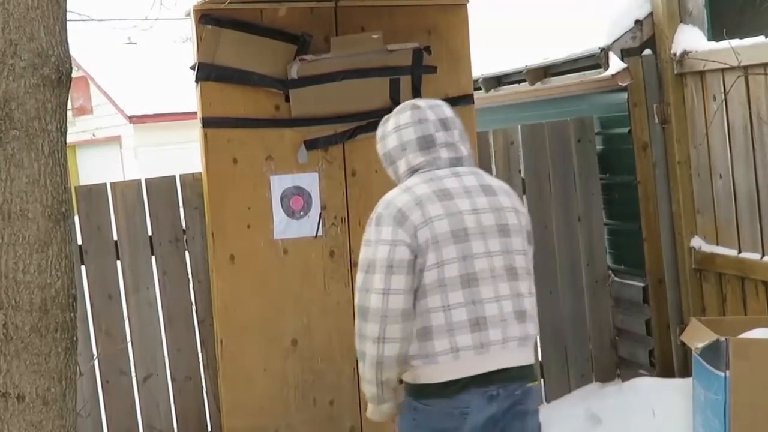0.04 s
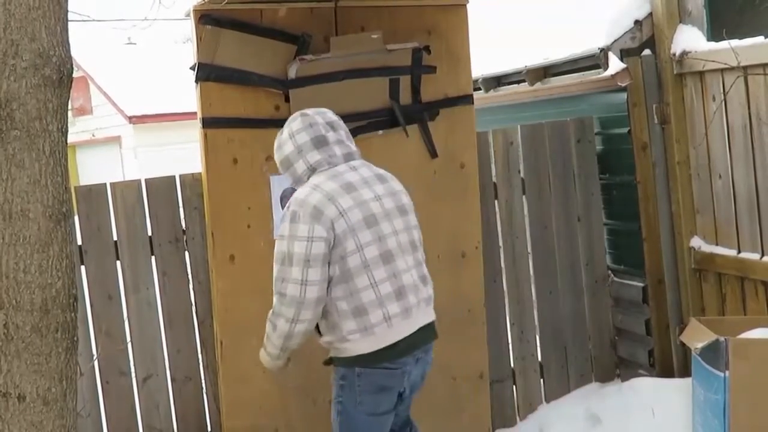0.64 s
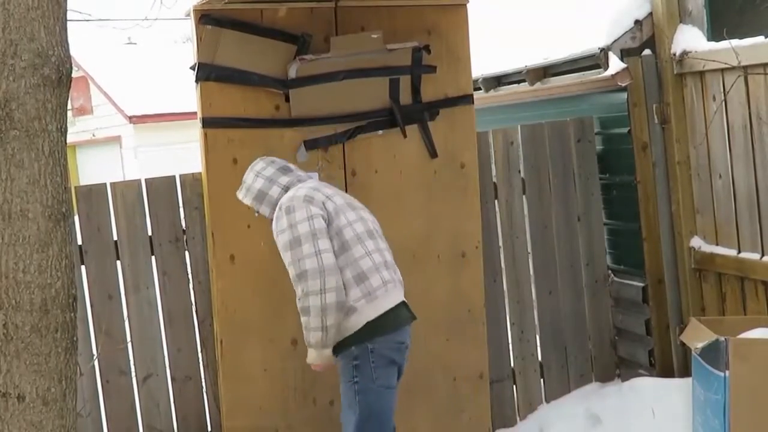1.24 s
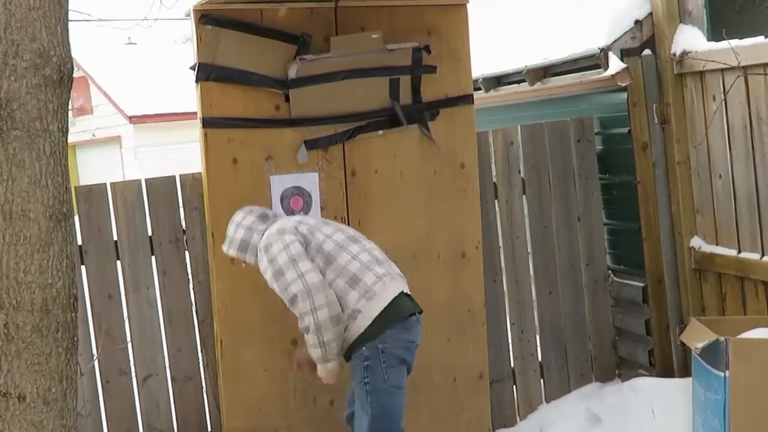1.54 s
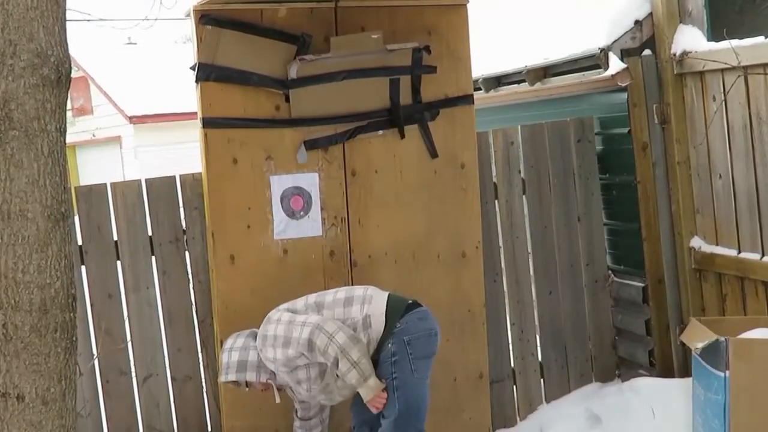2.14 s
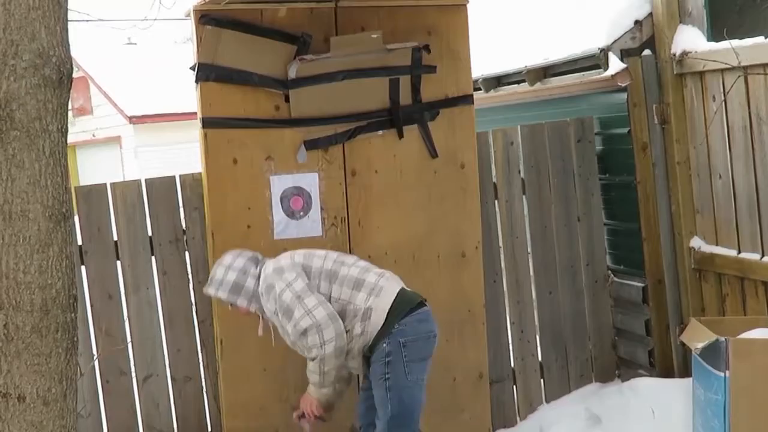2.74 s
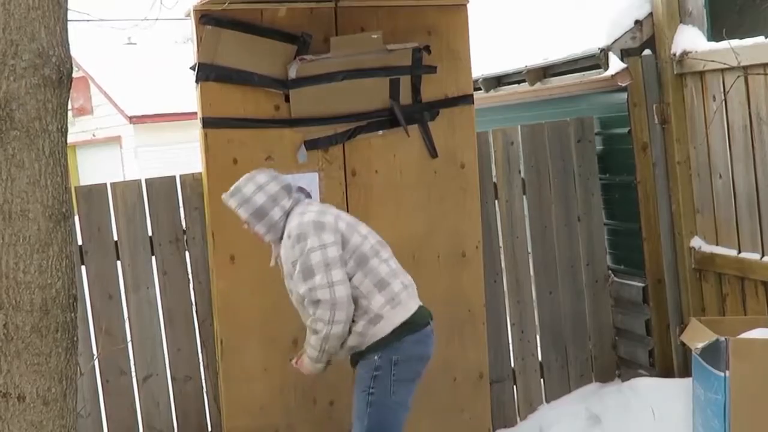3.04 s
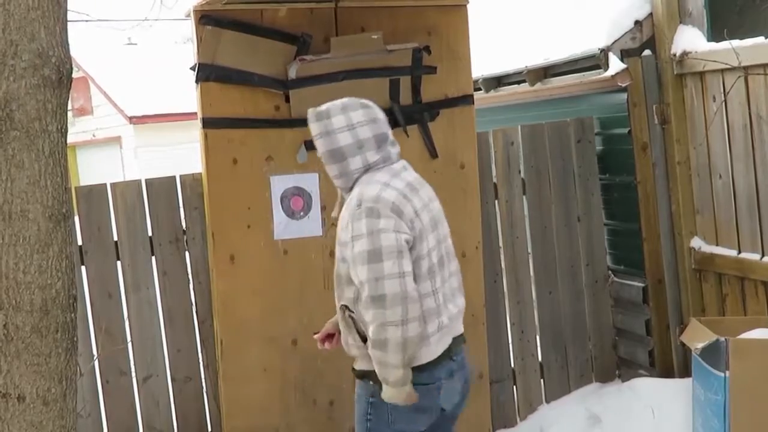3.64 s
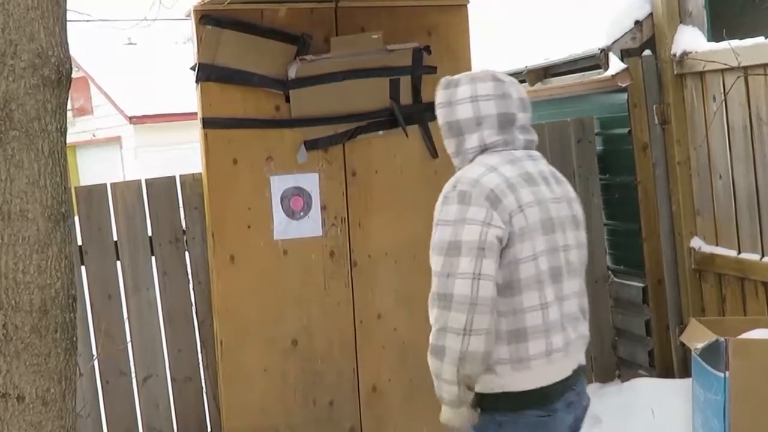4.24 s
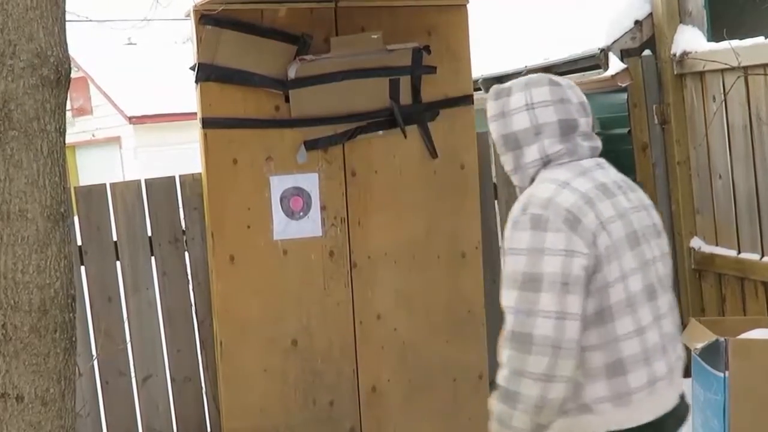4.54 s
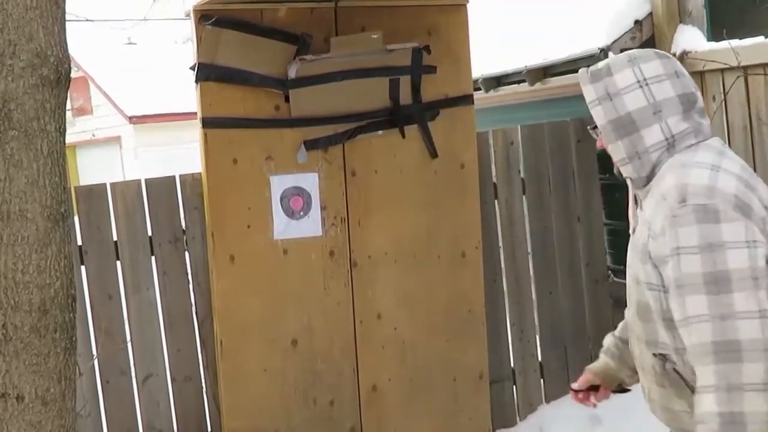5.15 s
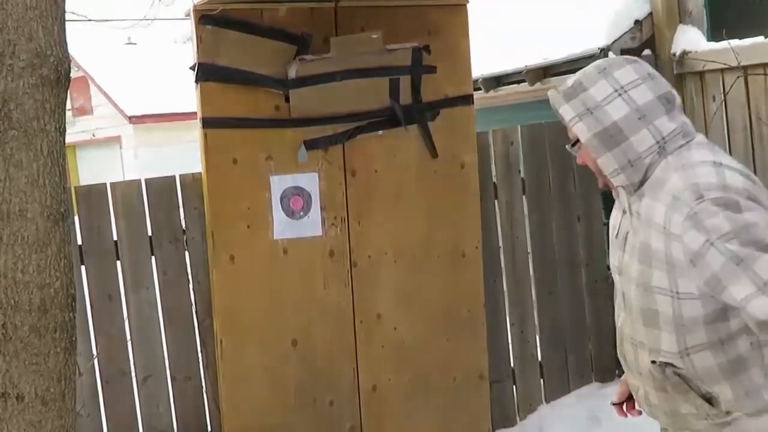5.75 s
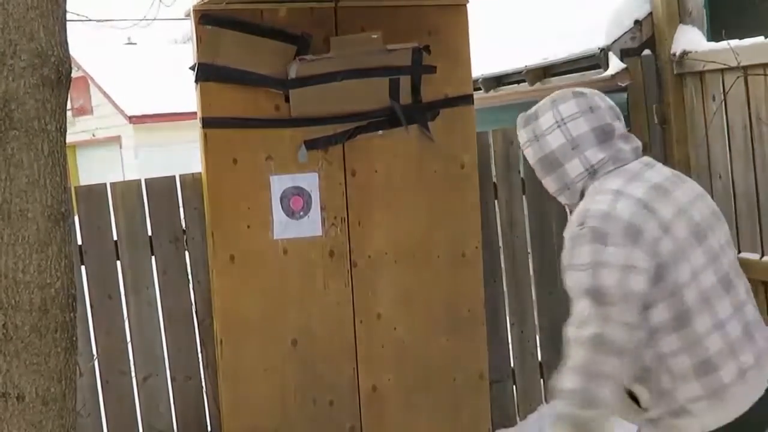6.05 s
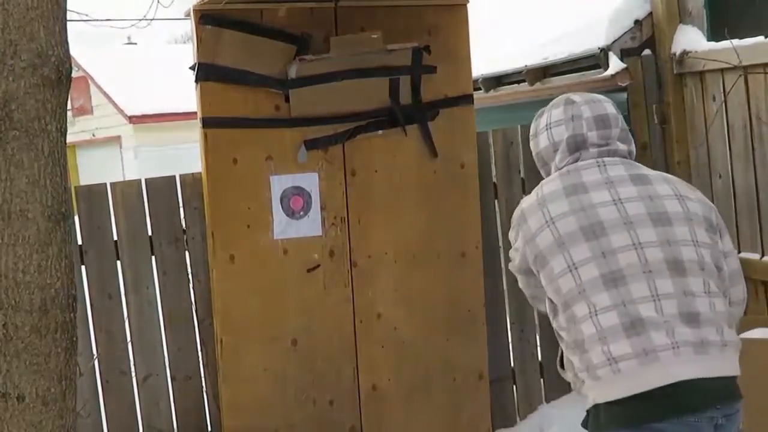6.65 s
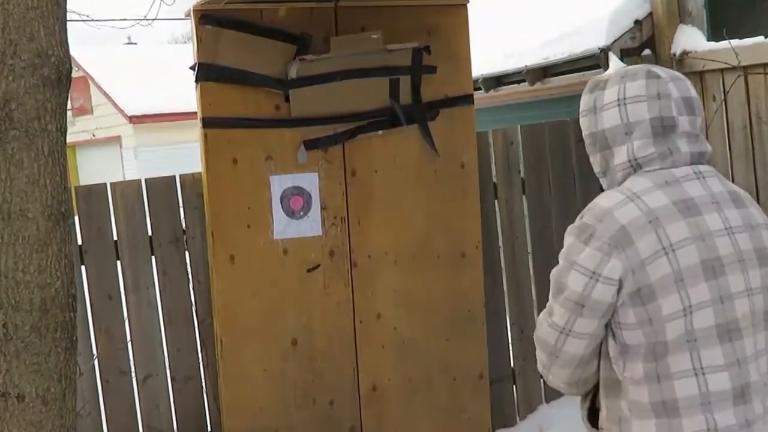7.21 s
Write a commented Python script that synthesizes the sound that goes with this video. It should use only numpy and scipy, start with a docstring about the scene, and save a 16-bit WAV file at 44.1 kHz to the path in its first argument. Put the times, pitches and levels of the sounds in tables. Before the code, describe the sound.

Low gusts of wind rumble and thump on the microphone outdoors, light at first and heavy through the middle. Underneath are soft boot steps in snow, small snaps of crust, a few early clicks of steel blades and a faint wash of far traffic. Once the wind eases, a single knife strikes a wooden board with a sharp, loud thwack that dies quickly in the fenced yard.

```python
"""Gusts buffet the microphone over the hum of a distant town, in a snowy, fenced yard.
Someone gathers throwing knives, steel ticking on steel, and walks back as the snow crunches and snaps.
Then one knife slams into a plywood board: fibres crack, the board rings and rattles, the yard echoes.
The blow overloads the recorder, whose gain control ducks and slowly recovers."""
import sys
import numpy as np
from scipy import signal
from scipy.fft import rfft, irfft, next_fast_len
from scipy.io import wavfile
from scipy.ndimage import uniform_filter1d, map_coordinates

SR = 44100
rng = np.random.default_rng(int(sys.argv[2]) if len(sys.argv) > 2 else 0)


def put_to_file(sound):
    """Save the sound as 16-bit audio at rate SR, in the file named by the first command-line argument."""
    columns = np.atleast_2d(sound).T  # one column per channel
    safe = np.clip(columns, -1, 1)
    whole_steps = np.round(safe * 32767)
    wavfile.write(sys.argv[1], SR, whole_steps.astype(np.int16))


N = 325458

# Level of the distant town's hum, with the recorder's ducking during the strong gusts drawn in.
# Each row: time in seconds, level in dB.
TOWN_LEVEL = [(0, -47), (2.0, -46), (2.7, -46.5), (3.1, -50.5), (4.0, -53.5), (5.3, -53), (5.9, -47),
              (6.6, -46), (7.38, -49)]
# The breeze between gusts. Each row: time in seconds, buffet in dB, flutter in dB relative to it.
BREEZE_LEVEL = [(0, -42.5, -22), (0.4, -54.5, -24), (0.85, -59, -18), (1.3, -67, -6), (1.95, -42, -17),
                (2.08, -33.5, -27), (2.36, -40, -21), (2.48, -28, -22), (2.6, -25.5, -32),
                (3.15, -29.5, -28), (3.44, -42, -22), (3.7, -27.5, -18), (4.1, -28.5, -18.5),
                (4.7, -25, -10.5), (5.02, -32.5, -8), (5.1, -30, -12), (5.3, -35, -9), (5.56, -45.5, -15),
                (5.74, -35.5, -31), (5.9, -34, -25), (5.96, -53, -22), (6.2, -55, -28), (6.6, -50.5, -23),
                (6.85, -77, -22), (7.2, -85, -26), (7.38, -42, -25)]
# Gusts. Each row: start, rise and length in seconds, buffet in dB, flutter in dB relative to it.
GUSTS = [(0.096, 0.013, 0.078, -33, -32), (0.815, 0.013, 0.028, -43, -35), (0.917, 0.0033, 0.027, -33, -39),
         (1.03, 0.008, 0.015, -45.5, -35), (1.545, 0.0071, 0.044, -36, -34),
         (1.688, 0.008, 0.015, -47, -37), (2.003, 0.0069, 0.022, -27.5, -6),
         (2.098, 0.015, 0.16, -18, -20.5), (2.285, 0.01, 0.018, -31, -31),
         (2.385, 0.037, 0.051, -19.5, -28), (2.445, 0.028, 0.063, -17, -11.5),
         (2.589, 0.02, 0.13, -18, -17), (2.733, 0.002, 0.01, -21, -5.5), (2.755, 0.014, 0.12, -18, -20.5),
         (2.85, 0.017, 0.096, -23, -11.5), (2.946, 0.047, 0.071, -14, -14),
         (3.053, 0.0074, 0.064, -25.5, -43), (3.245, 0.022, 0.096, -18, -21),
         (3.41, 0.0085, 0.0083, -23.5, -20), (3.462, 0.013, 0.028, -32, -14),
         (3.492, 0.026, 0.096, -17, -17), (3.571, 0.003, 0.022, -21.5, -8.5),
         (3.605, 0.016, 0.047, -21, -16.5), (3.717, 0.0078, 0.077, -17.5, -12),
         (3.835, 0.012, 0.032, -17, -13.5), (3.868, 0.009, 0.09, -21, -9), (3.985, 0.01, 0.013, -33, -26),
         (4.044, 0.0066, 0.03, -25, -8.5), (4.114, 0.002, 0.011, -20.5, -11),
         (4.175, 0.0016, 0.013, -20.5, -8.5), (4.211, 0.0064, 0.037, -24.5, -6.5),
         (4.265, 0.004, 0.028, -28, -14), (4.306, 0.003, 0.021, -18.5, -2),
         (4.36, 0.0092, 0.095, -25.5, -7.5), (4.499, 0.016, 0.074, -18, -7.5),
         (4.605, 0.012, 0.04, -23.5, -7), (4.699, 0.013, 0.024, -25.5, -9.5),
         (4.765, 0.058, 0.15, -17.5, -5), (4.908, 0.014, 0.043, -19, -3.5),
         (4.962, 0.017, 0.094, -21.5, -7.5), (5.025, 0.006, 0.035, -26, -9),
         (5.118, 0.02, 0.052, -18.5, -8.5), (5.205, 0.0013, 0.038, -20.5, -5),
         (5.235, 0.0079, 0.017, -20, -9.5), (5.317, 0.021, 0.15, -28.5, -28),
         (5.488, 0.0013, 0.025, -28.5, -12), (5.608, 0.024, 0.068, -26, -18.5),
         (5.84, 0.011, 0.014, -35.5, -17), (6.0, 0.0079, 0.025, -36.5, -25),
         (6.036, 0.0027, 0.012, -27.5, -21), (6.097, 0.0068, 0.24, -33.5, -15.5)]
# The buffet's pitch, low in the first light puffs. Each row: time in seconds, frequency ratio.
BUFFET_PITCH = [(0, 0.63), (1.6, 0.68), (2.1, 0.91), (3.2, 0.93), (4.2, 1.0), (5.4, 1.014), (6.3, 0.83)]
# The flutter's brightness. Each row: time in seconds, treble gain in dB.
FLUTTER_TREBLE = [(2.8, -16), (3.7, -4), (4.3, -4.5), (5.2, -7), (5.8, 2.5)]
# Eddies slapping the microphone. Each row: time in seconds, level in dB, pitch in Hz, width in seconds.
THUMPS = [(1.563, -23.5, 172, 0.0043), (2.0225, -6.5, 324, 0.002), (2.497, -13, 322, 0.0041),
          (2.511, -24, 600, 0.0012), (2.65, -13.5, 596, 0.00098), (2.7448, -4.5, 537, 0.0011),
          (2.969, -18, 587, 0.004), (3.295, -13, 288, 0.0041), (3.433, -10, 270, 0.0025),
          (3.5195, -14, 395, 0.0012), (3.5805, -15.5, 666, 0.0035), (3.748, -16, 800, 0.0029),
          (3.842, -4, 274, 0.0016), (3.8526, -11, 290, 0.002), (3.95, -10, 309, 0.0025),
          (4.13, -12, 497, 0.0018), (4.1768, -10, 659.4, 0.00041), (4.2284, -24, 890, 0.0017),
          (4.3177, -19, 970, 0.0011), (4.271, -21, 557, 0.0018), (4.3855, -13, 450, 0.0013),
          (4.534, -9, 345, 0.0025), (4.924, -18, 640, 0.0052), (4.928, -9, 342, 0.003),
          (4.974, -11.5, 366, 0.0034), (5.1863, -6.5, 317, 0.0029), (5.209, -20, 495, 0.00097),
          (5.256, -17, 480, 0.001), (5.624, -19, 314, 0.0019), (5.79, -19.5, 220, 0.0014),
          (5.87, -15, 273, 0.0041), (6.131, -17, 258, 0.0032)]
# Faint shuffling between steps. Each row: time in seconds, swish in dB, crunch in dB relative to it,
# crystal ticks in dB.
SHUFFLE = [(0, -71, 14.5, -61), (1.1, -65.5, -4, -52), (1.8, -67, 8, -58), (2.25, -67, 7.5, -57),
           (2.5, -72, 9.5, -58), (2.73, -76, 17.5, -54.5), (2.8, -72, -2, -58), (3.1, -72, 2, -62),
           (4.3, -73, 11.5, -51), (5.0, -74, 15.5, -53), (5.6, -74.5, 12.5, -60), (6.3, -69, 9.5, -56)]
# Boots pressing into snow, sleeves brushing. Each row: start, rise and length in seconds, swish in dB,
# crunch in dB relative to it.
STEPS = [(0.292, 0.029, 0.037, -60.5, 4), (0.949, 0.038, 0.3, -56, 5.5), (1.285, 0.032, 0.106, -55, 8),
         (1.375, 0.036, 0.079, -55.5, 11.5), (1.545, 0.016, 0.12, -62, 2), (2.105, 0.008, 0.01, -59.5, 9),
         (2.867, 0.039, 0.053, -57.5, 4.5), (2.95, 0.039, 0.018, -54.5, 7),
         (3.458, 0.02, 0.063, -61.5, 7.5), (3.622, 0.018, 0.015, -46, -3), (3.71, 0.034, 0.036, -51, 1),
         (4.743, 0.035, 0.056, -62, -4), (5.003, 0.036, 0.05, -55, 2), (5.11, 0.054, 0.025, -54, 7.5),
         (5.24, 0.0097, 0.015, -71.5, 18.5), (5.843, 0.031, 0.2, -61, 3), (6.074, 0.031, 0.18, -60, 7.5),
         (6.443, 0.071, 0.28, -62.5, 7)]
# Snow crust snapping. Each row: start in seconds, level in dB, t60 in seconds.
SNAPS = [(1.0273, -40, 0.02), (1.0984, -40, 0.033), (1.186, -38.5, 0.045), (1.439, -22.5, 0.024),
         (1.449, -36, 0.027), (1.471, -36, 0.02), (1.6195, -35, 0.013), (1.764, -46, 0.02),
         (1.951, -40.5, 0.026), (2.013, -36, 0.052), (2.8433, -42, 0.017), (2.9835, -41.5, 0.017),
         (3.6396, -49, 0.026), (3.7292, -38, 0.02), (4.1812, -44, 0.013), (4.3364, -45, 0.015),
         (4.401, -43, 0.011), (5.1441, -37, 0.02), (5.9902, -40, 0.015), (6.27, -46, 0.012),
         (6.949, -43, 0.06)]
# Knife hits. Each row: start in seconds, level in dB.
CLINKS = [(0.839, -42), (1.6707, -43.5), (2.015, -43)]  # blades touching in the hand
BOARD_HITS = [(6.677, -11.5)]  # the point striking the board
# Echoes off the fence and houses. Each row: delay in seconds, level in dB.
WALL_ECHOES = [(0.014, -14), (0.025, -18.5), (0.034, -17.5), (0.051, -25), (0.063, -22), (0.073, -38),
               (0.103, -29)]

# Ringing modes of plywood and steel. Each row: frequency in Hz, level in dB, t60 in seconds.
BOARD_MODES = [(263, -15, 0.39), (349, -3.5, 0.063), (383.6, -0.5, 0.13), (428, 2, 0.061), (478, -16, 0.17),
               (592, 0, 0.085), (745, -9, 0.078), (895, -14, 0.22), (1130, 2, 0.045), (1206, -6, 0.13),
               (1300, -4, 0.046), (1527, -19, 0.09), (1758, -5, 0.08), (1820, -9, 0.049), (1930, -13, 0.07),
               (2100, -4, 0.053), (2180, -11, 0.08), (2466, -14, 0.07), (2545, -9, 0.064),
               (2670, -4.5, 0.035), (2745, -10, 0.035), (3010, -11, 0.077), (3194, -16, 0.045),
               (3440, -9.5, 0.045), (3620, -22, 0.073), (3790, -12, 0.06), (3900, -21, 0.061),
               (4100, -35, 0.028), (4530, -19, 0.04), (5080, -20.5, 0.035), (5480, -16, 0.053)]
BLADE_MODES = [(9300, -11.5, 0.025), (9840, 1, 0.022), (10500, -4, 0.025), (11000, 4, 0.02),
               (11360, 5.5, 0.025), (11900, 1.5, 0.035), (12900, -7.5, .03)]
# How the yard's tail and the board's rattle die away. Each row: frequency in Hz, t60 in seconds.
YARD_DECAY = [(250, 0.23), (1000, 0.081), (3000, 0.16), (10000, 0.035)]
RATTLE_DECAY = [(200, 0.28), (500, 0.24), (1200, 0.17), (3000, 0.22), (6000, 0.15), (12000, 0.16)]

# Tone colours of the noise layers. Each row: frequency in Hz, relative spectral level in dB.
TOWN_EQ = [(20, -2), (60, 0.5), (170, -1), (400, 5.5), (650, 7.5), (900, 6.5), (1400, 2.5), (2200, -5),
           (3500, -15), (6000, -25.5), (9000, -30.5), (15000, -75.5)]  # far traffic
RUMBLE_EQ = [(20, -28), (50, 2), (100, 8), (150, 0), (250, -1), (600, -79)]  # slow eddies on the microphone port
BREEZE_EQ = [(20, -29), (45, -15.5), (130, 1), (250, -2), (400, -5), (550, -16), (1000, -58), (2000, -80)]  # the buffet of light air
GUST_EQ = [(20, -54.5), (45, -28), (90, -9.5), (170, 2), (260, 3.5), (420, 0.5), (540, -9), (750, -16.5),
           (1100, -29.5), (2000, -52.5), (5000, -90.5)]  # the buffet of strong flow
FLUTTER_EQ = [(150, -22), (400, -1), (650, 3), (900, 0.5), (1250, -3.5), (1800, -14), (2600, -28.5),
              (3500, -40.5), (4400, -30.5), (5500, -67.5), (9000, -65)]  # the smallest eddies
CRUNCH_EQ = [(600, -6.5), (1500, -1), (2400, -2.5), (3400, -4), (4600, -9), (6500, -18.5), (9000, -24.5),
             (15000, -51.5)]  # snow giving way
FIZZ_EQ = [(3000, 1.5), (6000, 5.5), (8000, 1.5), (10000, 2.5), (12300, 4), (14000, -1.5), (15700, -21)]  # fine grains and clothing
CRYSTAL_EQ = [(1000, -35), (2800, -15), (4400, -4.5), (6000, -1.5), (9000, -25), (15000, -41.5)]  # one snow crystal breaking
STEEL_EQ = [(5000, -25), (7200, -14), (8200, 7), (12500, -1.5), (15000, -11.5)]  # steel touching steel
RATTLE_EQ = [(100, -6), (170, 5), (320, -3), (500, -1), (800, 6.5), (1000, -5), (1250, -4), (1600, -3),
             (2300, -3), (3200, -11.5), (4500, -19), (7000, -24), (12000, -26), (15500, -45)]  # the board's many weak modes and loose fittings
CRACK_EQ = [(150, -14.5), (400, -6.5), (750, -10.5), (1050, -5), (1450, -5), (2700, -7), (3300, -7),
            (4500, -7), (5600, -19), (7000, -40), (9000, -28), (11500, -21.5), (15500, -23.5)]  # wood fibres splitting

TOP_HZ = 15750  # upper edge of the recorder's band


def amp(db):
    """Decibels to gain."""
    return 10 ** (np.asarray(db) / 20)


def unit(x):
    """x scaled to rms 1."""
    return x / np.sqrt(np.mean(x ** 2) + 1e-20)


def along(points, hz):
    """A curve of (Hz, value) points, read on a log frequency axis."""
    knots_hz, values = np.transpose(points)
    return np.interp(np.log(hz + 1), np.log(knots_hz + 1), values)


def curves(rows):
    """An automation curve, one value a sample, for each column after the time."""
    times, *columns = np.transpose(rows)
    return [np.interp(np.arange(N) / SR, times, column) for column in columns]


def wobble(rate):
    """A smooth random curve, rate knots a second."""
    knots = rng.standard_normal(int(N * rate / SR) + 4)
    return map_coordinates(knots, [np.arange(N) * rate / SR])


def filtered(x, response):
    """x through an EQ whose gain is a function of Hz."""
    size = next_fast_len(len(x) + 8192)
    return irfft(rfft(x, size) * response(np.fft.rfftfreq(size, 1 / SR)), size)[:len(x)]


def noise(spectrum, size=N, grain_db=0):
    """Coloured noise of rms 1; grain_db roughens it by spreading the sizes of its tiny impulses."""
    impulses = rng.standard_normal(size) * amp(grain_db * rng.standard_normal(size))
    return unit(filtered(impulses, lambda hz: amp(along(spectrum, hz))))


def steady_noise(spectrum, size=N):
    """Coloured noise whose power holds steady from one 30 ms to the next."""
    x = noise(spectrum, size)
    return x / np.sqrt(np.abs(uniform_filter1d(x ** 2, SR // 33)) + 1e-9)


def varispeed(x, speed):
    """x looped at a changing speed, so that its resonance slides."""
    return map_coordinates(x, [np.cumsum(speed) % (N - 1)], order=1)


def dying(x, decay):
    """Each frequency of x dies away with its own t60."""
    hz, t, bands = signal.stft(x, SR, nperseg=256)
    fade = amp(-60 * t / along(decay, hz)[:, None])
    return signal.istft(bands * fade, SR, nperseg=256)[1][:len(x)]


def ring(modes, t, wander_rad_per_root_s=7):
    """Damped modes struck together; their phases wander, which keeps the ring dry."""
    jitter = rng.standard_normal((len(modes), len(t)))
    drift = wander_rad_per_root_s * np.cumsum(jitter, axis=1) / np.sqrt(SR)
    return sum(amp(db - 60 * t / t60) * np.sin(2 * np.pi * hz * t + phase)
               for (hz, db, t60), phase in zip(modes, drift))


def add(track, start_s, sound):
    """Mix a sound into the track at start_s."""
    part = track[round(start_s * SR):][:len(sound)]
    part += sound[:len(part)]


def swells(events, bed_db, bed_relative_db, sag_db_per_s, release_db_per_s):
    """Events rise, sag and fade over a bed; gives dB curves for a main layer and one riding on it."""
    main, second = amp(bed_db) ** 2, amp(bed_db + bed_relative_db) ** 2
    t = np.arange(SR // 2) / SR
    for start, rise, length, db, relative_db in events:
        fall_db = sag_db_per_s * np.minimum(t, length) + release_db_per_s * np.maximum(t - length, 0)
        power = (np.minimum(t / rise, 1) * amp(db - fall_db)) ** 2
        add(main, start, power)
        add(second, start, power * amp(relative_db) ** 2)
    return 10 * np.log10(main), 10 * np.log10(second)


def town():
    """Far traffic merges into a soft, even wash."""
    level_db, = curves(TOWN_LEVEL)
    return amp(level_db) * noise(TOWN_EQ)


def breeze(trim_db=-3.5, unrest_db=1.5):
    """The restless air between gusts: its buffet in dB and its flutter relative to that."""
    level_db, flutter_db = curves(BREEZE_LEVEL)
    return level_db + trim_db + unrest_db * wobble(22), flutter_db


def rumble(flow_db, base_db=-41, reference_flow_db=-28, growth=0.71, lump_db=3.0):
    """Slow eddies on the microphone port; they grow less with the flow than the buffet does."""
    level_db = base_db + growth * (flow_db - reference_flow_db) + lump_db * wobble(25)
    return amp(level_db) * noise(RUMBLE_EQ)


def buffet(level_db, eddy_db, speed, break_up_db=-43.5):
    """The body of the wind: deep in light air, higher once the flow breaks up into eddies."""
    gust_share = 1 / (1 + amp(break_up_db - eddy_db) ** 2)
    light = np.sqrt(1 - gust_share) * varispeed(steady_noise(BREEZE_EQ), speed)
    strong = np.sqrt(gust_share) * varispeed(steady_noise(GUST_EQ), speed)
    return amp(level_db) * (light + strong)


def flutter(level_db, corner_hz=890):
    """The smallest eddies: dull in the first gusts, brighter in the later ones."""
    eddies = steady_noise(FLUTTER_EQ)
    dull = filtered(eddies, lambda hz: 1 / (1 + (hz / corner_hz) ** 6))
    treble_db, = curves(FLUTTER_TREBLE)
    return amp(level_db) * (dull + amp(treble_db) * (eddies - dull))


def thumps(trim_db=-1):
    """Single eddies slap the port: brief swings of pressure, over in milliseconds."""
    out, t = np.zeros(N), np.arange(-SR // 20, SR // 20) / SR
    for (time, db, hz, width), turn in zip(THUMPS, rng.random(len(THUMPS))):
        envelope = amp(db + trim_db) / np.cosh(2 * t / width)
        add(out, time + t[0], envelope * np.sin(2 * np.pi * (hz * t + turn)))
    return out


def wind(buffet_db=-0.77, buffet_lump_db=1.9, flutter_db=-2, flutter_lump_db=2.5, lump_octaves=0.13):
    """Gusts ride on the breeze; eddies pass the microphone in quick lumps, the stronger the higher."""
    flow_db, eddy_db = swells(GUSTS, *breeze(), sag_db_per_s=44, release_db_per_s=454.5)
    lumps = wobble(110)
    pitch, = curves(BUFFET_PITCH)
    speed = pitch * 2 ** (lump_octaves * lumps)
    return (rumble(flow_db)
            + buffet(flow_db + buffet_db + buffet_lump_db * lumps, eddy_db, speed)
            + flutter(eddy_db + flutter_db + flutter_lump_db * lumps)
            + thumps())


def crackle(grains_per_s=200, centre_hz=3400, spread_octaves=0.6, decay_cycles=4.9, spread_db=4):
    """Coarse grains of snow break, each at its own pitch; rms 1."""
    out, t = np.zeros(N), np.arange(SR // 200) / SR
    for pitch, size in rng.standard_normal((int(grains_per_s * N / SR), 2)):
        hz = min(centre_hz * 2 ** (spread_octaves * pitch), TOP_HZ)
        envelope = amp(spread_db * size) * np.exp(-t * hz / decay_cycles)
        add(out, rng.uniform(0, N / SR), envelope * np.sin(2 * np.pi * hz * t))
    return unit(out)


def crystals(ticks_per_s=35):
    """Larger snow crystals break one by one, in sharp ticks."""
    breaks = (rng.random(N) < ticks_per_s / SR) * rng.uniform(1, 10, N)
    return filtered(breaks, lambda hz: amp(along(CRYSTAL_EQ, hz)))


def footsteps(fizz_db=-1.0, crunch_db=-1.25, crackle_db=-12, ticks_db=-3, clump_db=1.57):
    """Snow gives way under the boots in clumps of fine grains, along with the swish of clothing."""
    bed_db, bed_crunch_db, crisp_db = curves(SHUFFLE)
    swish_db, weight_db = swells(STEPS, bed_db, bed_crunch_db, sag_db_per_s=13, release_db_per_s=225.5)
    fizz = amp(swish_db + fizz_db) * noise(FIZZ_EQ, grain_db=4.0)
    grains = amp(crunch_db) * noise(CRUNCH_EQ, grain_db=5.5)
    crunch = amp(weight_db) * (grains + amp(crackle_db) * crackle())
    ticks = amp(crisp_db + ticks_db) * crystals()
    return amp(clump_db * wobble(150)) * fizz + amp(clump_db * wobble(90)) * crunch + ticks


def snaps(trim_db=-6, fizz_db=-14):
    """Bits of crust break with a short burst of grains."""
    out, t = np.zeros(N), np.arange(SR // 8) / SR
    for start, db, t60 in SNAPS:
        grains = noise(CRUNCH_EQ, len(t)) + amp(fizz_db) * noise(FIZZ_EQ, len(t))
        add(out, start, amp(db + trim_db - 60 * t / t60) * grains)
    return out


def clinks(ring_db=-14, scrape_db=-6, scrape_t60=0.0085, grip_t60=0.024):
    """Blades touch with a tick; the hand damps their ring at once."""
    out, t = np.zeros(N), np.arange(SR // 8) / SR
    for start, db in CLINKS:
        scrape = amp(scrape_db - 60 * t / scrape_t60) * noise(STEEL_EQ, len(t))
        choked_ring = amp(ring_db - 60 * t / grip_t60) * ring(BLADE_MODES, t)
        add(out, start, amp(db) * (choked_ring + scrape))
    return out


def yard(x, scatter_db=-17, predelay_s=0.008, dull_hz=2300):
    """Walls return dull echoes; slats and clutter scatter a short tail."""
    tail = dying(rng.standard_normal(SR // 2), YARD_DECAY)
    out = np.zeros(N)
    add(out, predelay_s, amp(scatter_db) * signal.fftconvolve(x, tail / np.linalg.norm(tail)))
    dull = filtered(x, lambda hz: 1 / (1 + 1j * hz / dull_hz))
    for delay, db in WALL_ECHOES:
        add(out, delay, amp(db) * dull)
    return out


def knife_hit(crack_db=-9, crack_t60=0.06, rattle_db=-6.5, blade_db=-23,
              bite_s=0.00037, radiate_hz=235, push_db=-13, push_s=0.0017):
    """The point splits the fibres, shoves the board and sets it ringing; the stuck blade pings."""
    out, t = np.zeros(N), np.arange(SR // 2) / SR
    # air slips round the open board, so its slowest modes barely radiate
    open_board = signal.butter(4, radiate_hz, "highpass", fs=SR, output="sos")
    push = amp(push_db) * (1 - t / push_s) * np.exp(-t / push_s)
    attack = 1 - np.exp(-t / bite_s)
    for start, db in BOARD_HITS:
        rattle = amp(rattle_db) * dying(steady_noise(RATTLE_EQ, len(t)), RATTLE_DECAY)
        wood = signal.sosfilt(open_board, (ring(BOARD_MODES, t) + rattle) * attack)
        crack = amp(crack_db - 60 * t / crack_t60) * noise(CRACK_EQ, len(t))
        blade = amp(blade_db) * ring(BLADE_MODES, t)
        add(out, start, amp(db) * (wood + push + crack + blade))
    return out


def gain_control(x, threshold_db=-20, lag_s=0.0085, recovery_db_per_s=7, sidechain_hz=900):
    """Ducks a moment after a loud sound and creeps back up; its sidechain is deaf to rumble."""
    sidechain = filtered(x, lambda hz: hz ** 4 / (hz ** 4 + sidechain_hz ** 4))
    level_db = 10 * np.log10(np.abs(uniform_filter1d(sidechain ** 2, SR // 250)) + 1e-12)
    over_db = np.maximum(level_db - threshold_db, 0)
    t = np.arange(N) / SR
    cut_db = np.maximum.accumulate(over_db + recovery_db_per_s * t) - recovery_db_per_s * t
    return x * amp(-np.interp(t - lag_s, t, cut_db))


def scene():
    """The mono mix at the microphone; only the blow feeds the yard's echoes."""
    blow = knife_hit()
    return (blow + yard(blow) + wind() + footsteps() + snaps() + clinks() + town())[None]


def record(dry, ceiling=0.52):
    """The recorder rides the gain, soft-clips the overload and cuts the extreme top."""
    ducked = gain_control(dry[0])
    clipped = ducked / (1 + np.abs(ducked / ceiling) ** 6) ** (1 / 6)
    return filtered(clipped, lambda hz: 1 / (1 + (hz / TOP_HZ) ** 150))[None]


dry = scene()
out = record(dry)
put_to_file(out)
```